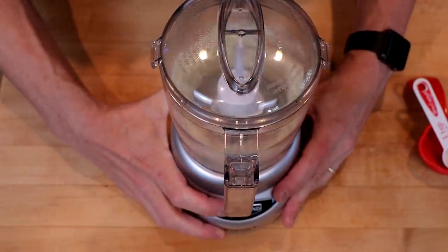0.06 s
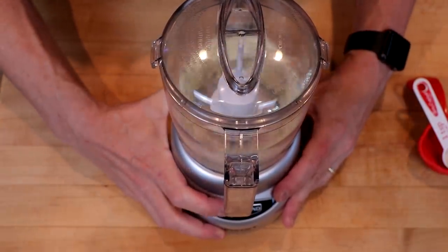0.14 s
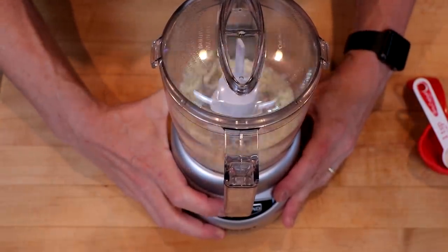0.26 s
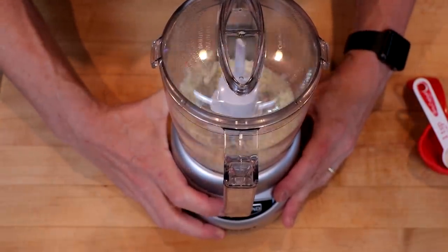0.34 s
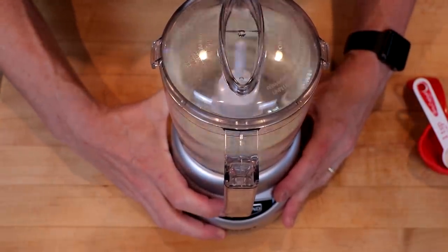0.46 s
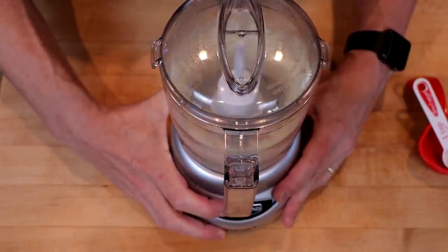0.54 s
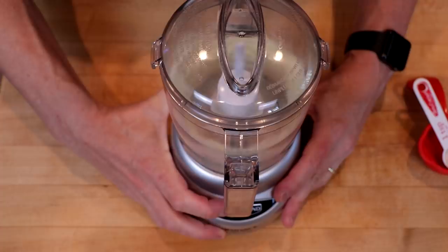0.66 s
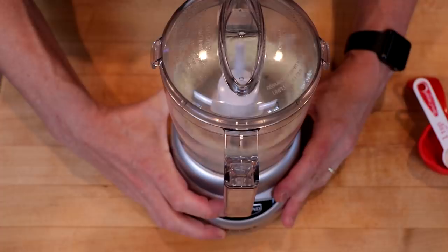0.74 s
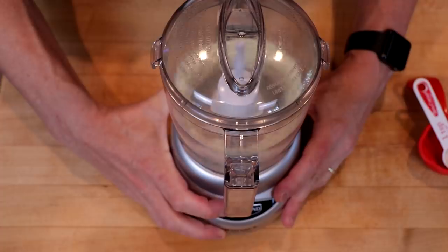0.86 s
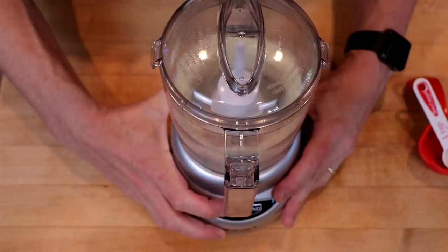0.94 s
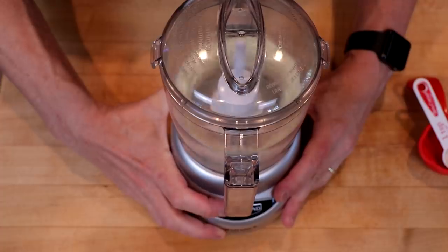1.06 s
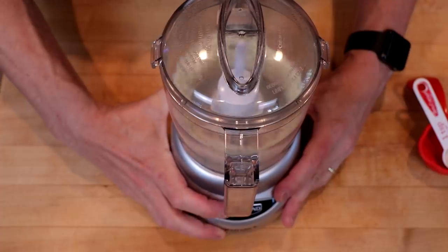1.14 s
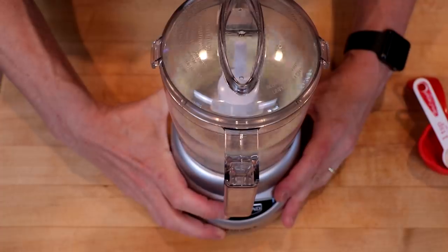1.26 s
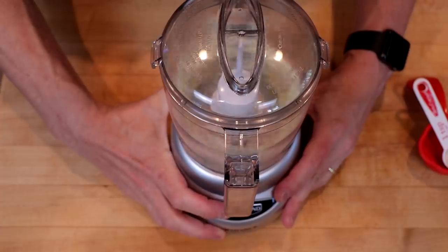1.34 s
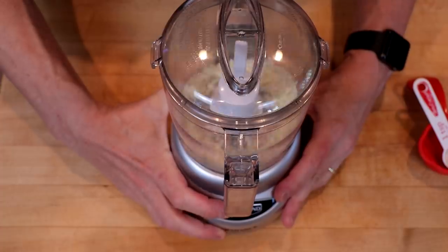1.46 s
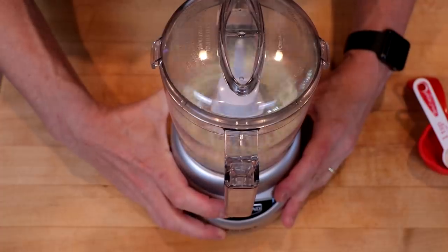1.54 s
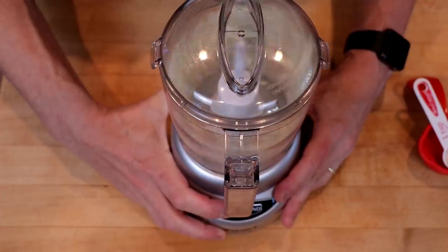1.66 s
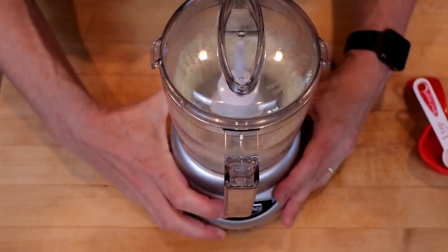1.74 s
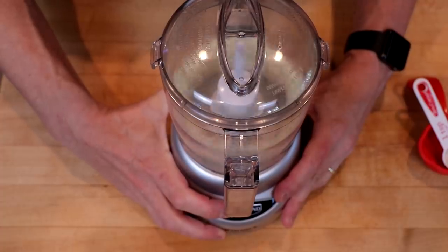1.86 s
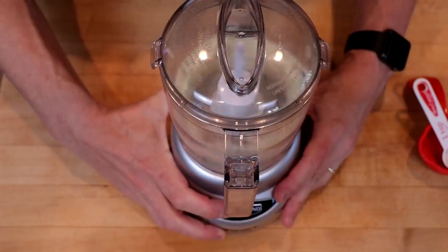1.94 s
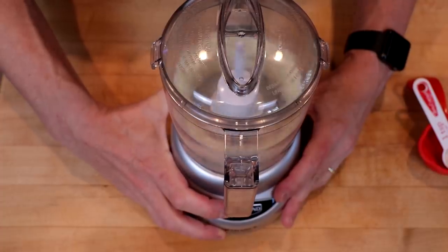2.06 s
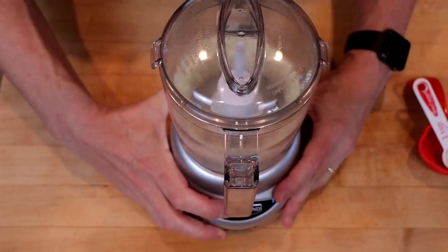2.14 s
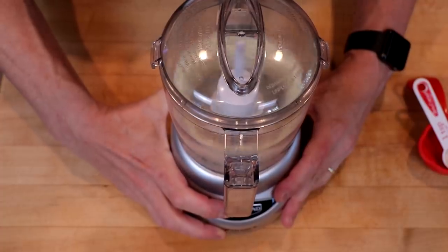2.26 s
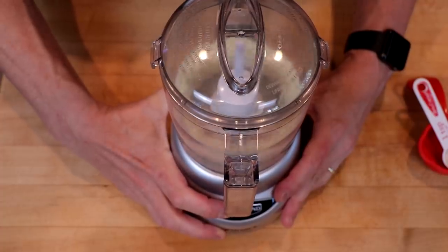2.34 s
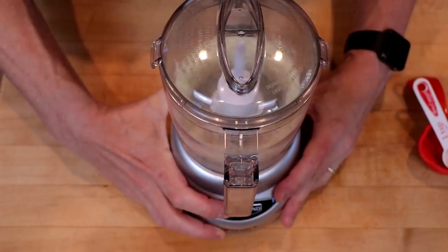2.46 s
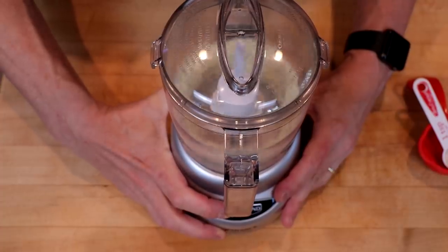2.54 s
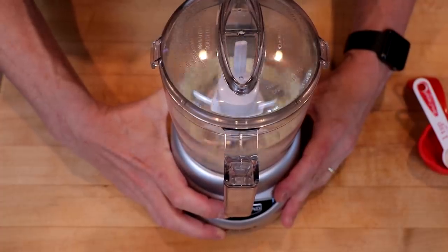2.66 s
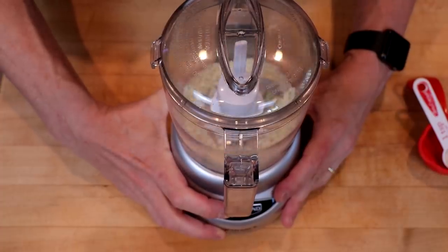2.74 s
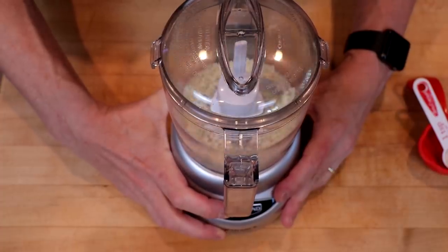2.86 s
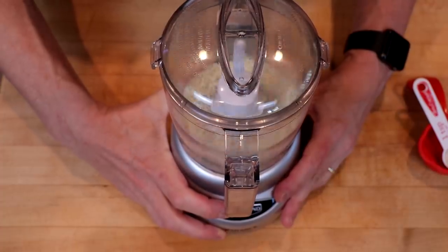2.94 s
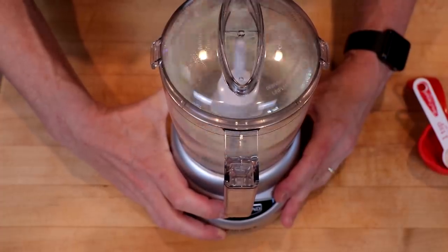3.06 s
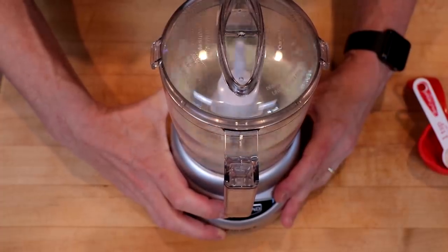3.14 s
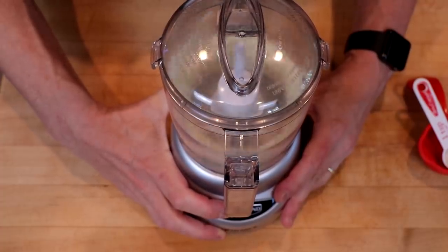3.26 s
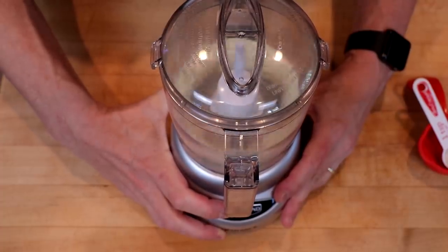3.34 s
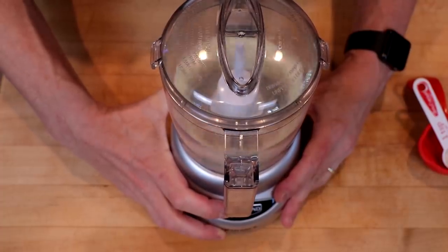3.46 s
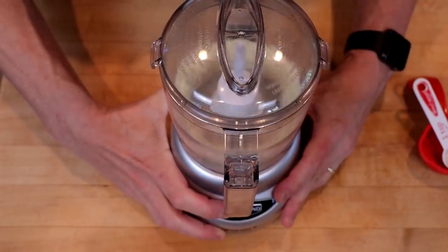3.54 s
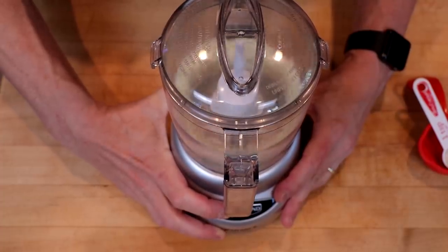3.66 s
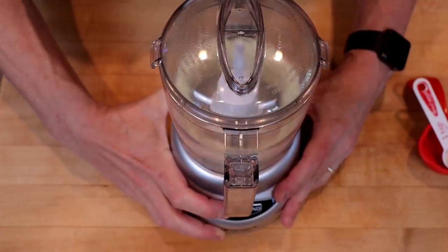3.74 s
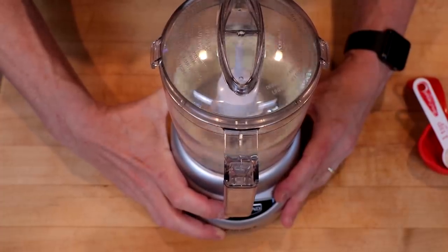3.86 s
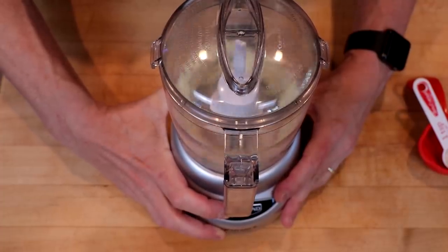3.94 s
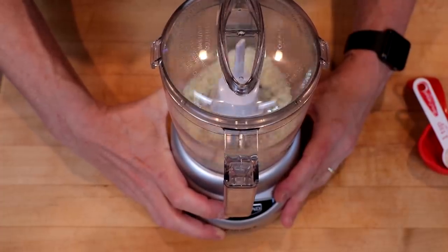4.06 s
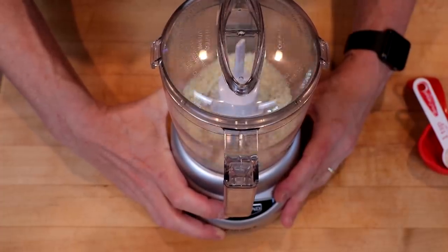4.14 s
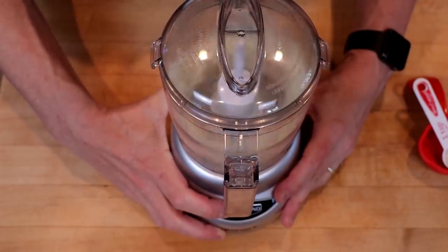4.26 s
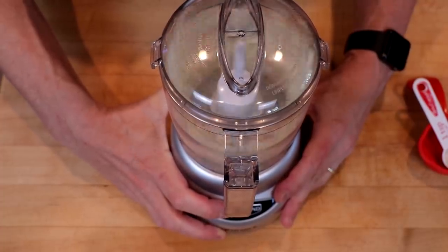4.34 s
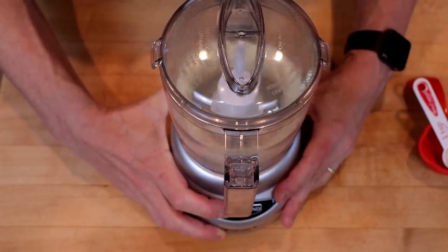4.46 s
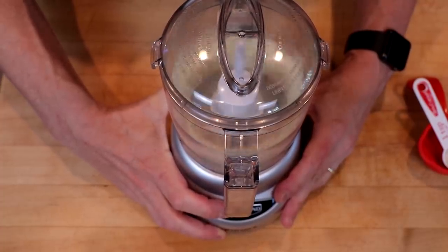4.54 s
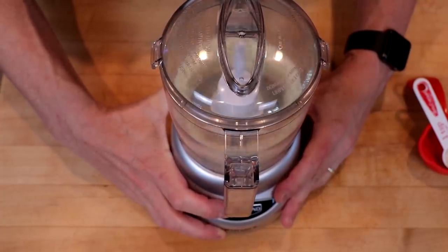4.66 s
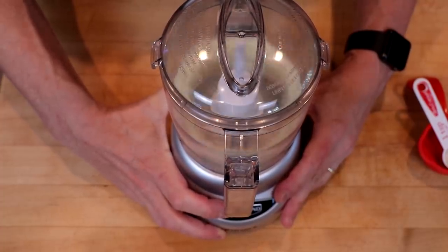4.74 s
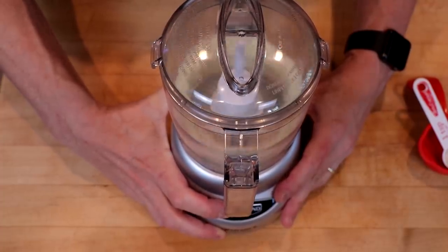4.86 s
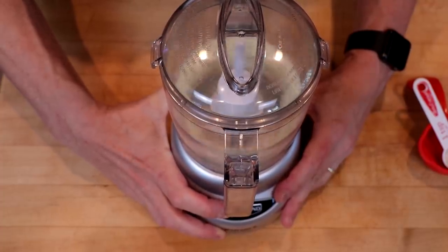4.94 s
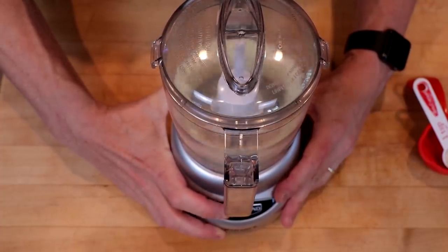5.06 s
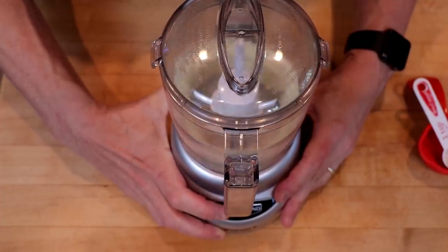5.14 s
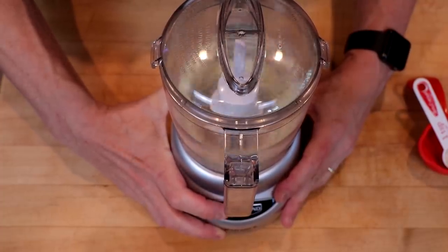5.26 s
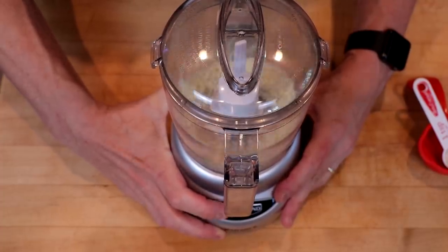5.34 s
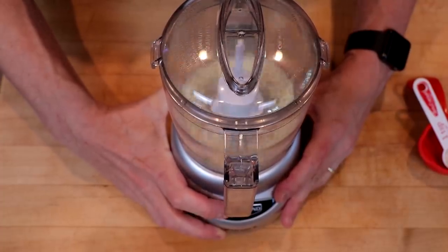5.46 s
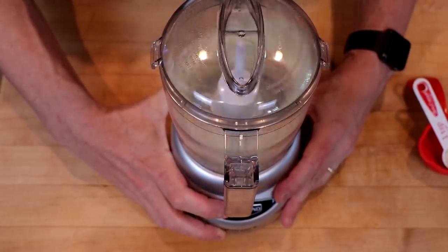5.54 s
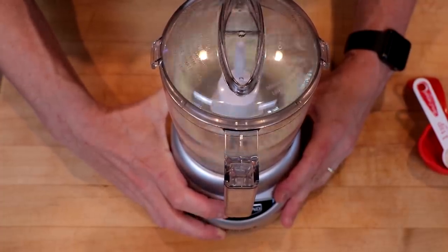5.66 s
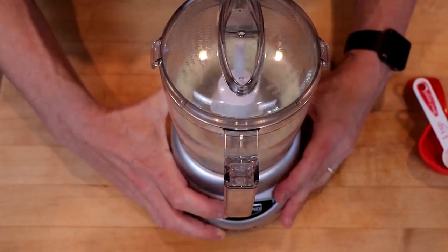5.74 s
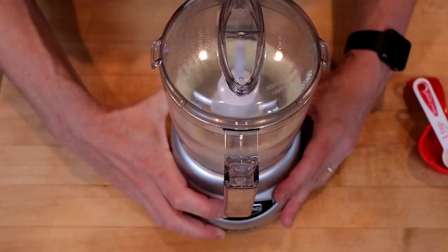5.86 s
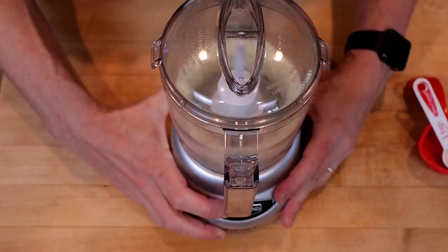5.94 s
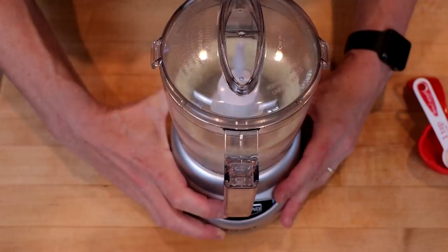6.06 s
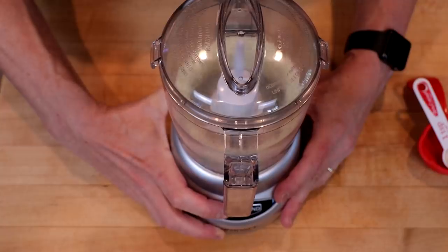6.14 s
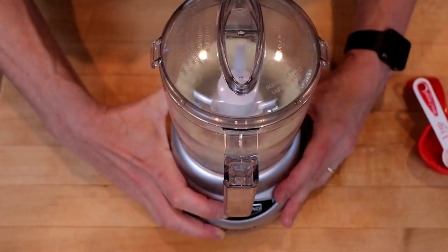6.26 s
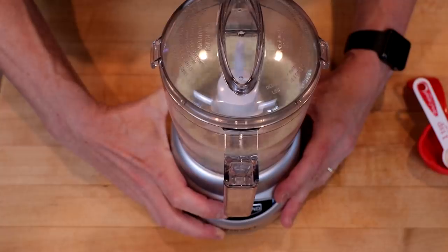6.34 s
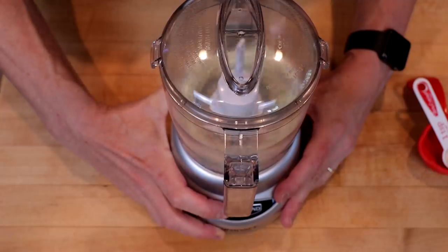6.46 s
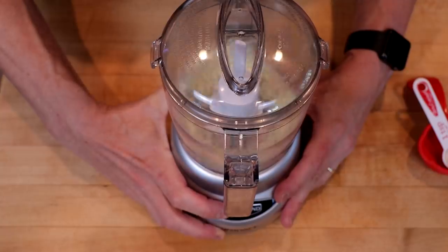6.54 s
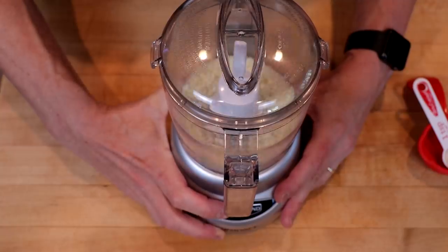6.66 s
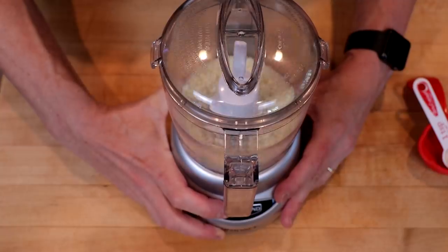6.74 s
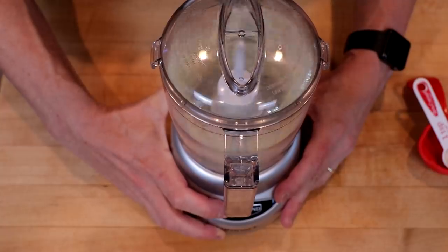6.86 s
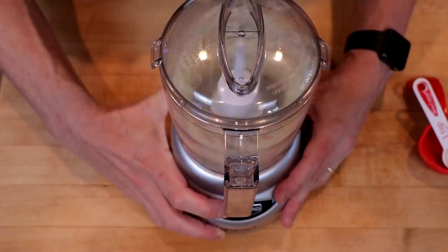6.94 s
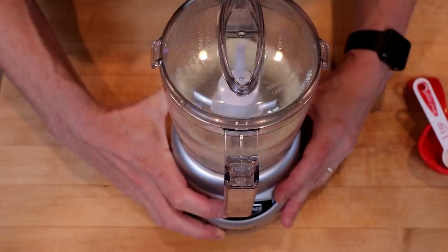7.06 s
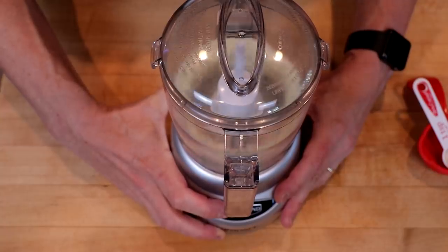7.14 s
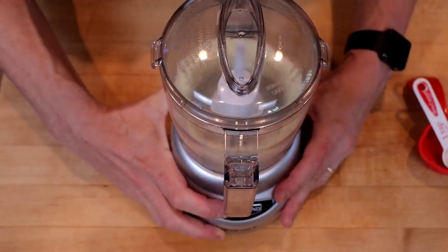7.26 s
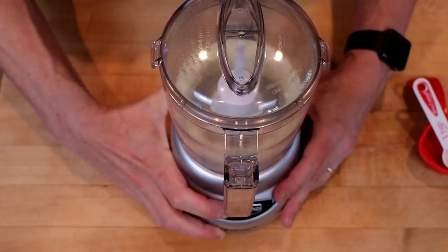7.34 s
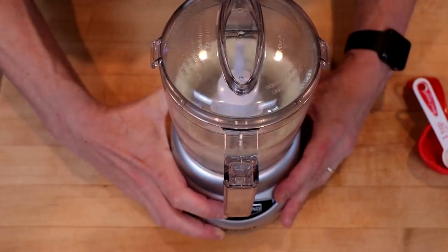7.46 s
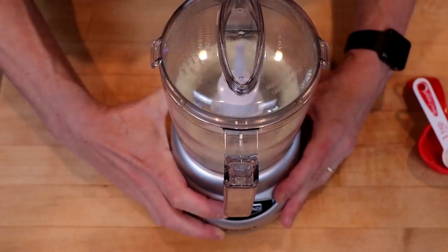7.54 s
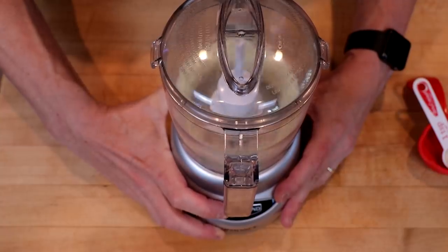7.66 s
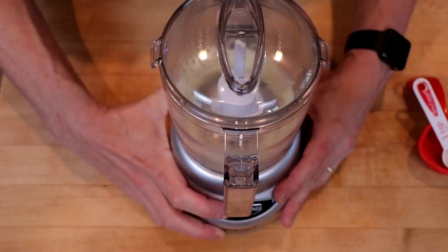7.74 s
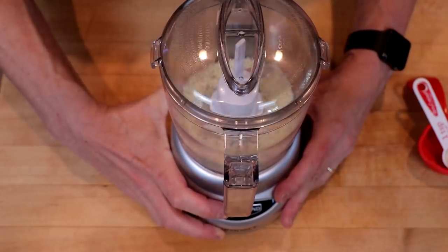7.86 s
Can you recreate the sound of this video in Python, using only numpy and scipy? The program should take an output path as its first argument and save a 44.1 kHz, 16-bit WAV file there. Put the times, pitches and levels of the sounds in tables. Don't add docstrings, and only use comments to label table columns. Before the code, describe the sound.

In a quiet kitchen, a little electric chopper is pulsed at regular intervals, heard from nearby. The tail of one spin dies away first. Then, six times, the motor bites with a low hum, the gears scream up in a rough buzzing whine, cheese and flour spatter and thump around the plastic bowl, and the pitch slides down after release. Brief near-silences with faint fridge hum separate the pulses.

```python
import sys
import numpy as np
from scipy import signal
from scipy.fft import rfft, irfft, next_fast_len
from scipy.io import wavfile
from scipy.ndimage import uniform_filter1d

SR = 44100
rng = np.random.default_rng(int(sys.argv[2]) if len(sys.argv) > 2 else 0)


def invert_db(level):
    return 10 ** (np.asarray(level, dtype=float) / 20)


def digitize_waveform(pressure):
    field = np.atleast_2d(pressure).T
    bounded = np.clip(field, -1, 1)
    quanta = np.round(bounded * 32767).astype(np.int16)
    wavfile.write(sys.argv[1], SR, quanta)


N = 348390
TIME = np.arange(N) / SR


def evened(x):
    return x / np.sqrt(np.mean(abs(x) ** 2) + 1e-20)


def read(points, hz):
    f, value = np.transpose(points)
    return np.interp(np.log(hz + 1), np.log(f + 1), value)


def coloured(x, spectrum):
    size = next_fast_len(len(x))
    gain = invert_db(read(spectrum, np.fft.rfftfreq(size, 1 / SR)))
    return irfft(rfft(x, size) * gain, size)[:len(x)]


def resonate(x, hz, width_hz):
    return signal.lfilter(*signal.iirpeak(min(hz, 18000), hz / width_hz, SR), x)


def lowpassed(x, hz):
    return signal.sosfilt(signal.butter(2, hz, fs=SR, output="sos"), x)


def slow(hz):
    return evened(lowpassed(rng.standard_normal(N), hz))


def add(mix, start_s, sound):
    part = mix[round(start_s * SR):][:len(sound)]
    part += sound[:len(part)]


def bumps(rows):
    return sum(height * np.exp(-((TIME - s) / half_s) ** 2) for s, height, half_s in rows)


# (on [s], off [s], hum [dB], loaded mesh speed before creep [Hz], bowl load [dB])
EARLIER = (-0.63, -0.21, -50, 2840, -6.5)
# (on [s], off [s], starting hum [dB], loaded mesh speed before creep [Hz], bowl load [dB])
POWER = [
    (.357, 1.008, -52, 2833, -1),
    (1.549, 2.281, -52.5, 2823, -1),
    (2.91, 3.574, -53.5, 2880, -0.5),
    (4.198, 4.882, -51.5, 2842, -1),
    (5.47, 6.123, -52.5, 2885, -0.5),
    (6.748, 7.36, -55.5, 2864, -1),
]
# (time [s], speed sag [teeth/s], half length [s])
JAMS = [(.66, 160., 0.043), (.95, 77, 0.1), (1.85, 70., .055), (2.07, 50., .04), (2.25, 60., .08),
        (3.215, 70., 0.045), (3.43, 70., .04), (4.495, 80., .045), (4.85, 50., .06), (5.82, 30., .04),
        (5.99, 30., .04), (7.09, 50., .05), (7.27, 30., .04)]
# (time [s], surge [dB], half length [s])
HEAPS = [(.372, 7.5, .012), (.62, 7.5, 0.019), (.844, 3, 0.079), (1.56, 7.5, 0.024), (1.824, 0.5, .05),
         (2.054, 4.5, 0.031), (2.31, 1.5, 0.089), (3.16, 2, 0.042), (4.21, 5.5, 0.011), (4.804, 6.5, 0.013),
         (5.507, 7.5, 0.011), (5.615, -5, 0.005), (6.11, 1.5, 0.013), (7.1, 2.5, 0.038), (7.28, 3.5, 0.069),
         (7.448, 2.5, 0.031)]
KICK_HZ, SPIN_UP_S, CREEP_HZ_PER_S = 349.6, .105, 120.
LOADED_S, LOADING_S, LOAD_SAG_HZ = .265, .03, 260.
FRICTION_HZ, EASING_HZ_PER_S, DRAG_S, SETTLE_HZ = 5350., 75., .9, 230.
STIR_S, STIR_DB = .011, -5


def motor():
    hz, powered, load_db, stir_db = np.zeros((4, N))
    for on, off, _, top_hz, db in [EARLIER] + POWER:
        held = np.clip(TIME - on, 0, off - on)
        free = np.maximum(TIME - off, 0)
        now = TIME >= on
        spin_up = (top_hz + LOAD_SAG_HZ - KICK_HZ) * np.exp(-held / SPIN_UP_S)
        driven = top_hz - spin_up + CREEP_HZ_PER_S * held
        driven += LOAD_SAG_HZ / (1 + np.exp((held - LOADED_S) / LOADING_S))
        friction = FRICTION_HZ - EASING_HZ_PER_S * off
        braked = (driven + friction) * np.exp(-free / DRAG_S) - friction
        hz[now] = (SETTLE_HZ * np.logaddexp(0, braked / SETTLE_HZ))[now]
        powered[now] = (free == 0)[now]
        load_db[now] = db
        stir_db[now] = (STIR_DB * np.clip(1 - held / STIR_S, 0, 1))[now]
    return hz - powered * bumps(JAMS), powered, load_db + bumps(HEAPS), stir_db


# (full-speed level [dB], powered slope [dB/octave], coasting slope [dB/octave],
# extra slope when stalling [dB/octave], share of load and surges [dB/dB])
GEAR_LAW = (-32.5, 7.5, 8, 16.5, 0.28)
BOWL_LAW = (-42, 2.9, 5, 8.5, 1.5)
GRIT_LAW = (-41.5, 7, 11, -5, 0.22)
FULL_HZ, STALL_HZ = 3080, 404


def control(law, hz, powered, load_db, stir_db):
    full_db, powered_db, coast_db, stall_db, share = law
    octaves = np.log2(np.minimum(hz / FULL_HZ, 1))
    stall_octaves = np.log2(np.minimum(hz / STALL_HZ, 1))
    coasting = coast_db * octaves + stall_db * stall_octaves
    level_db = full_db + np.where(powered, powered_db * octaves, coasting) + share * load_db + stir_db
    return uniform_filter1d(invert_db(level_db), size=60)


TEETH = 57


def per_turn(teeth, orders):
    table = np.zeros(256, complex)
    table[np.r_[-orders:orders + 1]] = np.exp(2j * np.pi * rng.random(2 * orders + 1))
    table = evened(np.fft.ifft(table))
    return table[(teeth / TEETH * 256).astype(int) % 256]


def blade_beat(hz, teeth):
    depth_db = 2.6 + 1.6 * np.clip(1 - hz / FULL_HZ, 0, 1)
    return invert_db(depth_db * per_turn(teeth, orders=8).real)


# (multiple [1], level [dB], backlash spread [Hz])
MESH = [(1, -2, 166), (2, -1.5, 172), (3, -3.5, 280), (4, -5.5, 210), (5, -8, 220), (6, -8, 470)]
# (frequency [Hz], gain [dB])
HOUSING = [(300, 8), (600, -1.5), (1000, 7.5), (1400, 5.5), (1800, 0.5), (2000, 5), (2500, 1), (3000, 0.7),
           (3700, -1.5), (4700, 2.5), (6000, -0.5), (8500, 2.5), (12000, -3), (13600, -7.5)]
# (frequency [Hz], width [Hz], gain [dB])
PANELS = [(610, 180, 2.5), (740, 120, -5.5), (1024, 120, -3.5), (1430, 110, -3), (2000, 160, 2),
          (2360, 160, 4), (2834, 54, -3), (4930, 130, -11), (5575, 63, 1.5), (6120, 240, 2), (7160, 83, 0),
          (7540, 210, -22.5), (10800, 94, 5)]
# (frequency [Hz], density [dB/Hz])
RATTLE = [(700, -4.5), (1400, -7), (2200, 3.5), (3000, -2), (3700, -9.5), (5000, -2.5), (7000, -4),
          (9000, -10), (11000, -26)]


def gears(hz, teeth, beat):
    whine = np.zeros(N)
    speed = np.clip(hz / 2800, 0, 1)
    acceleration = uniform_filter1d(np.gradient(hz) * SR, size=900)
    pull = np.clip(acceleration / 12000.0, 0, 1)
    for k, db, spread_hz in MESH:
        backlash = evened(slow(spread_hz) + 1j * slow(spread_hz))
        wobble = .6 / k + .4 * per_turn(teeth, orders=3) + .6 * backlash
        wobble += .3 * (1 - speed) ** 2
        patches = invert_db(1.2 * slow(10.))
        tone = evened(wobble * patches) * np.exp(2j * np.pi * k * teeth)
        seated_db = -6. * pull / k
        seated_db -= (pull == 0) * (1 - speed) * (7 if k == 1 else 9)
        gain = invert_db(db + seated_db + read(HOUSING, k * hz))
        whine += gain * tone.real * (k * hz < 17000)
    panels = sum(invert_db(db) * resonate(whine, f, width_hz) for f, width_hz, db in PANELS)
    whine = invert_db(-3.5) * (whine + panels)
    shaken = beat * invert_db(2.0 * slow(410.0)) * rng.standard_normal(N)
    rattle = evened(coloured(shaken, RATTLE))
    return invert_db(0.5) * speed ** 0.066 * whine + invert_db(-6.0) * rattle


# (frequency [Hz], width [Hz], gain [dB])
BOWL = [(165, 64, -23.5), (260.7, 34, -0.5), (325, 120, -9.5), (436, 120., -16.5), (594, 47, 0),
        (703, 100, -5), (795, 190, -4.5), (981, 35, -4.5), (1193, 130, -9), (1376, 64, -6)]
# (time [s], peak level [dB])
LUMPS = [(0.616, -40.5), (0.788, -30.5), (0.849, -39.5), (1.239, -64.5), (1.806, -14), (2.041, -20.5),
         (2.238, -36), (2.327, -16), (2.995, -28.5), (3.201, -19.5), (3.345, -30), (3.469, -24.5),
         (3.744, -37), (4.251, -16.5), (4.5, -16), (4.649, -22), (4.798, -33), (4.857, -18.5), (5, -20.5),
         (5.099, -46), (5.619, -40), (5.988, -16.5), (6.088, -26), (6.13, -18.5), (6.314, -48),
         (6.923, -45), (7.029, -22.5), (7.224, -25), (7.327, -19), (7.406, -32)]


def ring_bowl(x):
    return sum(invert_db(db) * resonate(x, hz, width_hz) for hz, width_hz, db in BOWL)


def bowl(load):
    hits = rng.random(N) < 900. / SR
    crumbs = invert_db(2.5 * np.minimum(rng.exponential(1, N), 4)) * hits
    drive = evened(crumbs * rng.standard_normal(N)) + 0.92 * rng.standard_normal(N)
    drive = lowpassed(drive, 2200.)
    lumps, t = np.zeros(N), TIME[:700]
    envelope = np.minimum(t / 0.00029, 1) * np.exp(-t / 0.0043)
    for s, db in LUMPS:
        add(lumps, s, invert_db(db) * rng.standard_normal(700) * envelope)
    slap = invert_db(-16.0) * resonate(lumps, 2200, 2500.)
    return invert_db(-2.5) * load * evened(ring_bowl(drive)) + invert_db(1.5) * ring_bowl(lumps) + slap


# (frequency [Hz], density [dB/Hz])
GRIT = [(8000, -16), (9000, -3), (10000, 2), (11500, 1.5), (12600, 0.5), (13400, -4), (14600, -3.5),
        (15700, -5)]


def grit(beat):
    flicker = invert_db(1.5 * slow(300.))
    return evened(coloured(beat * flicker * rng.standard_normal(N), GRIT))


# (time [s], peak level [dB], ring [Hz], treble [dB], knock [dB])
CLICKS = [
    (0.2139, -55.5, 980, -20, -12.5),
    (0.363, -30, 2080, -10, -11.5),
    (1.552, -38.5, 2000, -4, -18.5),
    (2.857, -79, 6441, -1.5, -28),
    (4.205, -36, 2050, 4, -35.5),
    (6.737, -73, 2200, -14, -12),
    (6.758, -37, 1810, -1.5, -9),
]


def clicks():
    out, t = np.zeros(N), TIME[:900]
    for s, db, hz, treble_db, knock_db in CLICKS:
        ring = np.sin(2 * np.pi * hz * t) * np.minimum(t / 0.00028, 1) * np.exp(-t / 0.0024)
        noise = rng.standard_normal(900)
        tick = invert_db(treble_db) * resonate(noise, 6500, 7000.) * np.exp(-t / 0.00096)
        knock = invert_db(knock_db) * np.sin(2 * np.pi * 620 * t) * np.exp(-t / 0.0035)
        add(out, s, invert_db(db + 8.0) * (ring + tick + knock))
    return out


def hum():
    out = np.zeros(N)
    for on, off, db, *_ in POWER:
        t = TIME[:round((off - on) * SR)]
        wave = np.sin(2 * np.pi * 120 * t) + invert_db(-27.5) * np.sin(2 * np.pi * 240 * t)
        current = 0.32 + np.exp(-t / 0.15)
        add(out, on, invert_db(db) * current * wave * signal.windows.tukey(len(t), .05))
    return out


# (frequency [Hz], t60 [s])
KITCHEN = [(200, 0.22), (1000, 0.5), (4000, 0.47), (12000, 0.077)]


def kitchen(x):
    taps = np.zeros(SR // 2)
    at = np.arange(200, SR // 2 - 20, 20)
    taps[at + rng.integers(0, 20, len(at))] = rng.choice([-1., 1.], len(at))
    hz, t, z = signal.stft(taps, SR, nperseg=256)
    decay = invert_db(-60 * t / read(KITCHEN, hz)[:, None])
    tail = signal.istft(z * decay, SR, nperseg=256)[1]
    return signal.fftconvolve(x, tail / np.linalg.norm(tail))[:N]


# (frequency [Hz], peak level [dB])
FRIDGE = [(119, -71.), (237, -75.), (404, -76.), (927, -82.)]
# (frequency [Hz], density [dB/Hz])
AIR = [(40, -15), (100, -2), (170, -10.5), (250, -0.5), (330, -4.5), (520, -2), (640, -14.5), (950, -13),
       (1500, -17), (2300, -22), (3200, -25), (3900, -33.5), (12300, -37), (12900, -67.5)]
AIR_DB = -70


def kitchen_air():
    lines = sum(invert_db(db + 5.6 * slow(8.5)) * np.sin(2 * np.pi * hz * TIME) for hz, db in FRIDGE)
    return invert_db(AIR_DB + 2.0) * evened(coloured(rng.standard_normal(N), AIR)) + lines


def scene():
    state = motor()
    hz = state[0]
    teeth = np.cumsum(hz) / SR
    beat = blade_beat(hz, teeth)
    machine = control(GEAR_LAW, *state) * gears(hz, teeth, beat)
    machine += bowl(control(BOWL_LAW, *state))
    machine += control(GRIT_LAW, *state) * grit(beat)
    machine += clicks() + hum()
    return (machine + invert_db(-14.0) * kitchen(machine) + kitchen_air())[None]


# (frequency [Hz], density [dB/Hz])
STAND = [(20, -30.), (38, -14.), (48, -1.), (70, -4.), (100, -5.), (160, -25.), (320, -80.)]


def stand_rumble():
    shake = invert_db(-81.) + invert_db(-36.) * control(BOWL_LAW, *motor())
    return shake * evened(coloured(rng.standard_normal(N), STAND))


# (frequency [Hz], gain [dB])
RESPONSE = [(30, -40.), (60, -22.), (110, -6.), (170, 0.), (12600, 0.), (12900, -5.5), (15700, -6.),
            (15950, -67.)]


def top_cut(x):
    return signal.sosfilt(signal.butter(12, 15780, fs=SR, output="sos"), x)


def record(dry):
    mix = coloured(dry[0], RESPONSE) + stand_rumble()
    return top_cut(mix[None])


dry = scene()
out = record(dry)
digitize_waveform(out)
```